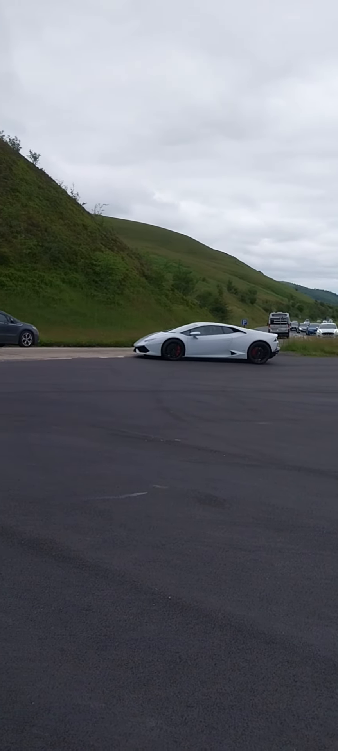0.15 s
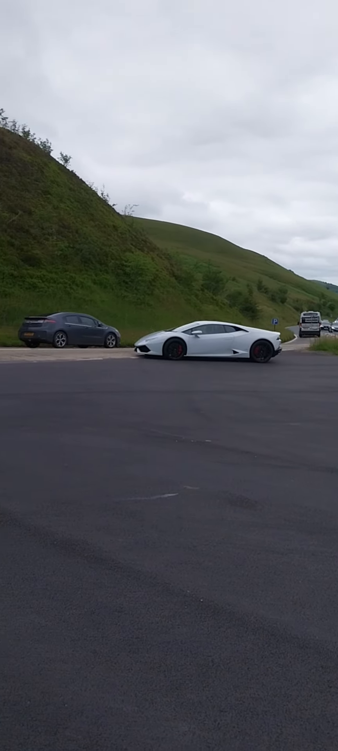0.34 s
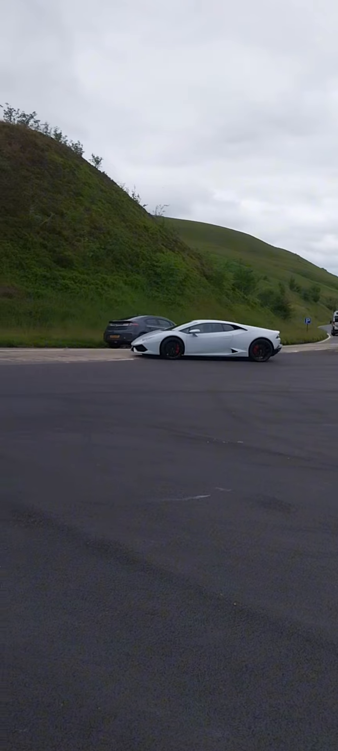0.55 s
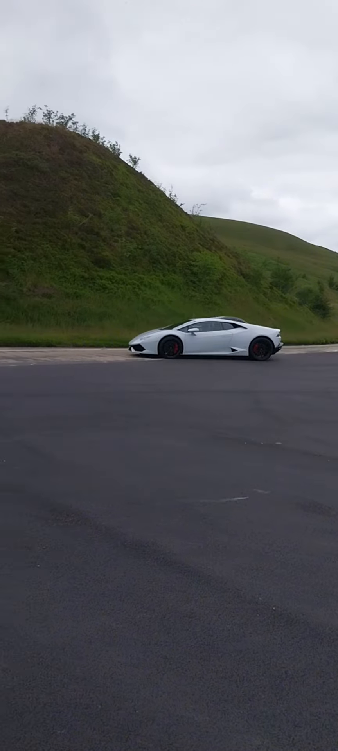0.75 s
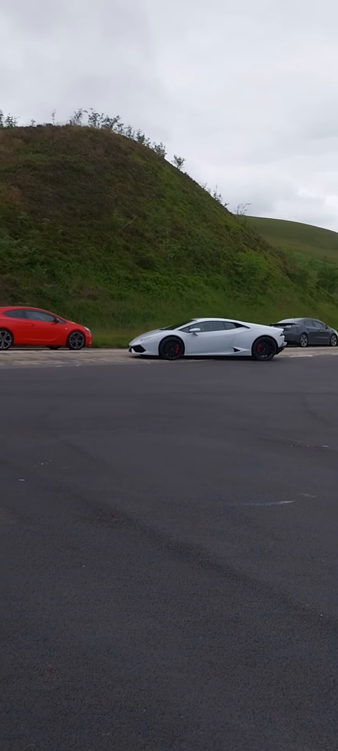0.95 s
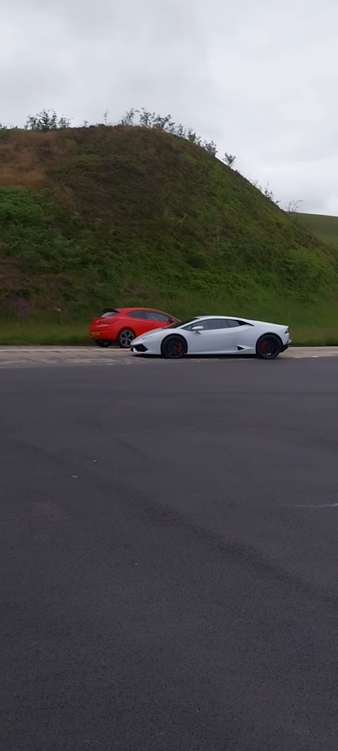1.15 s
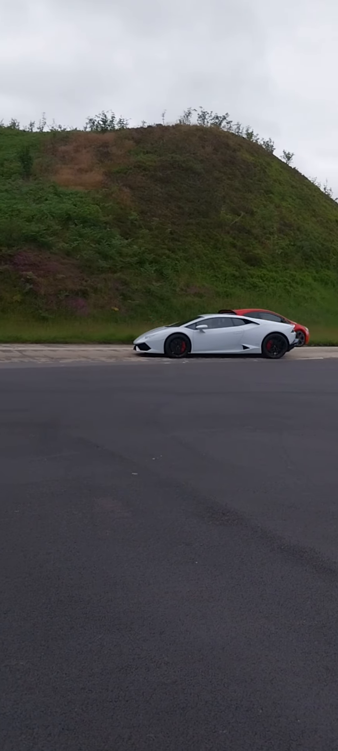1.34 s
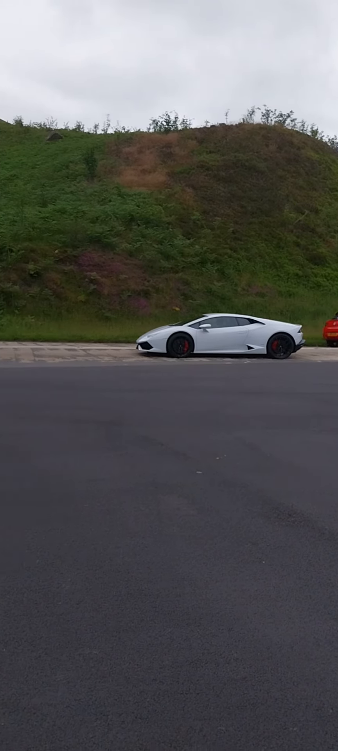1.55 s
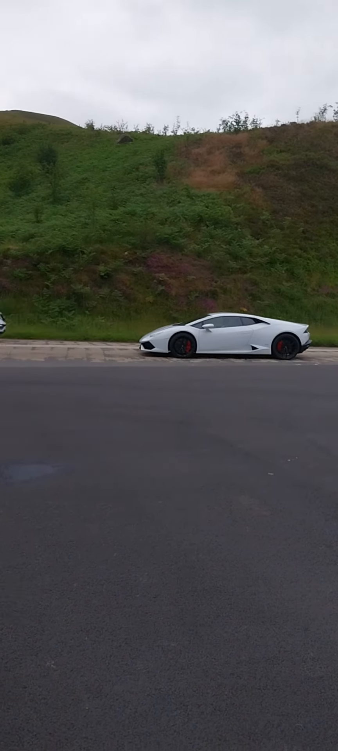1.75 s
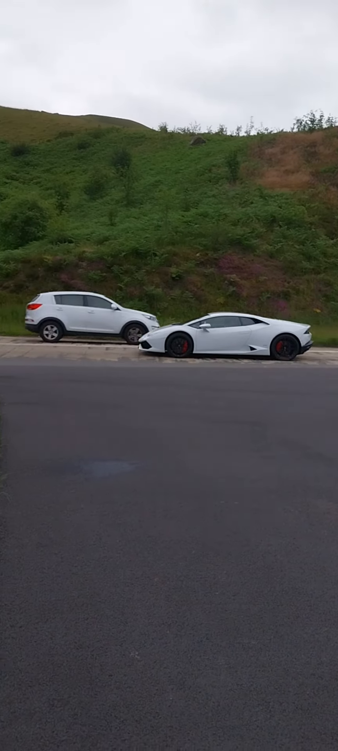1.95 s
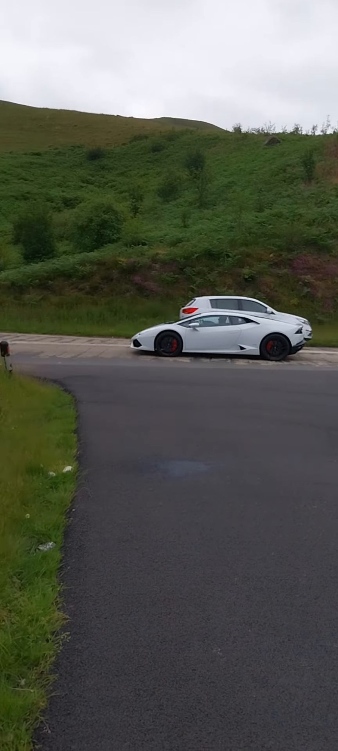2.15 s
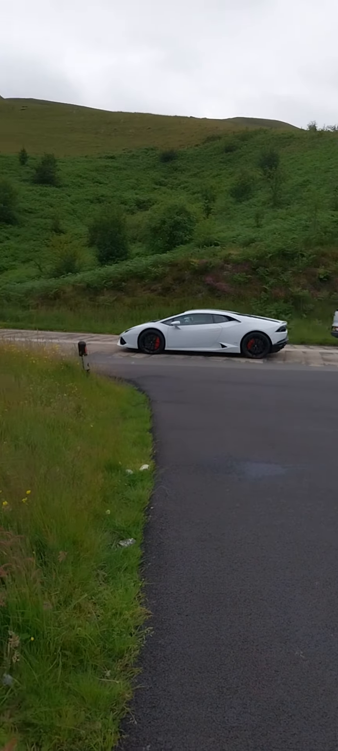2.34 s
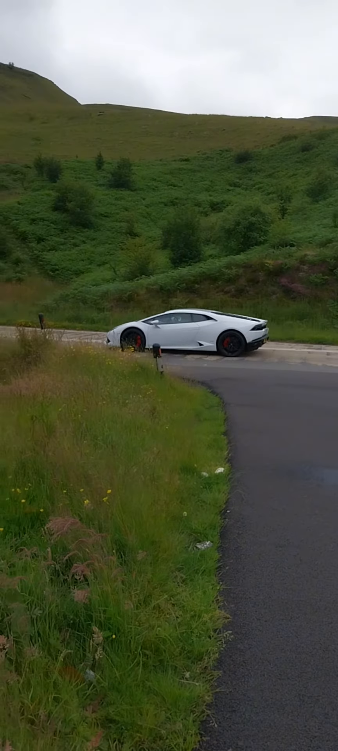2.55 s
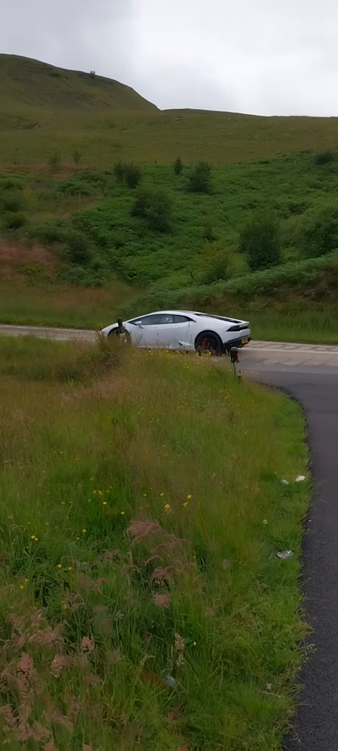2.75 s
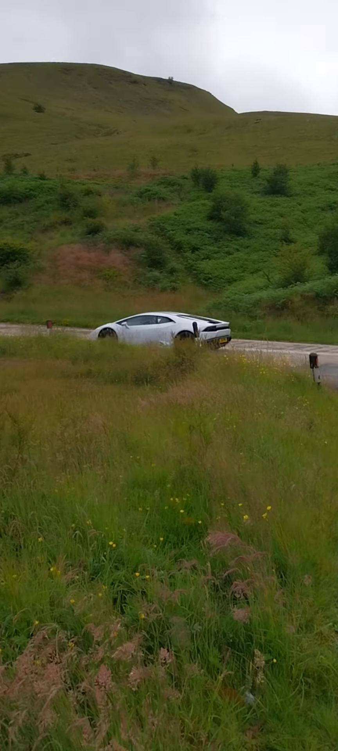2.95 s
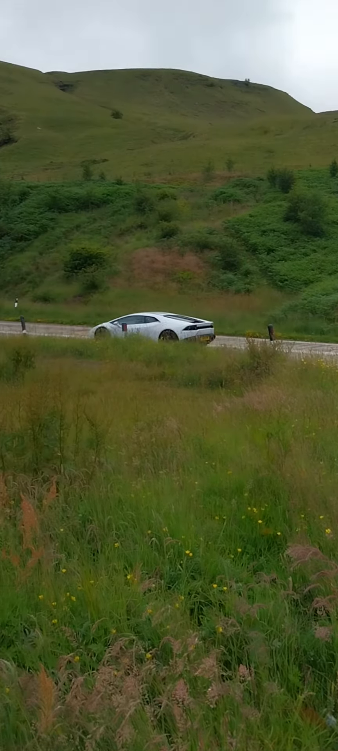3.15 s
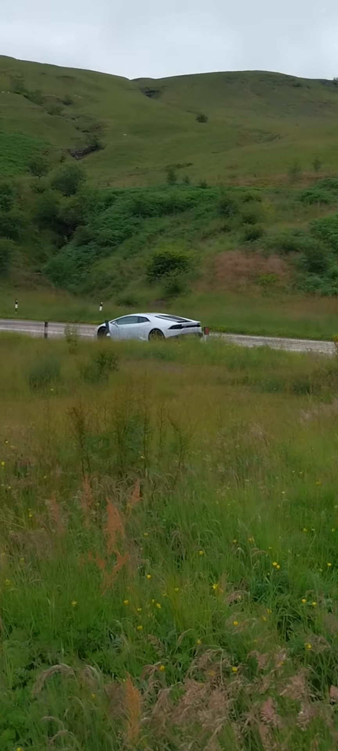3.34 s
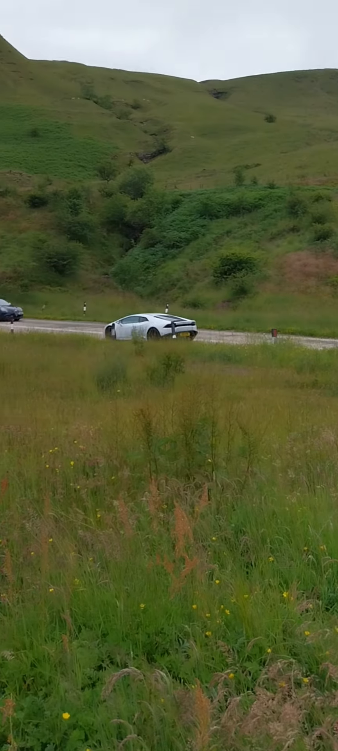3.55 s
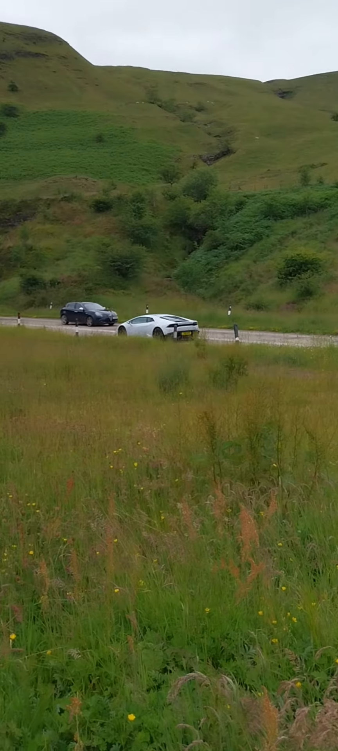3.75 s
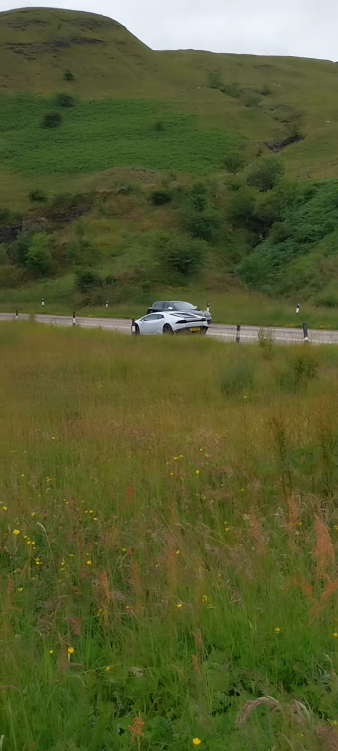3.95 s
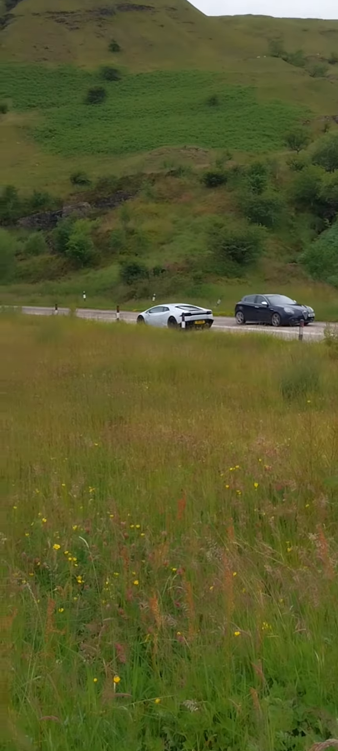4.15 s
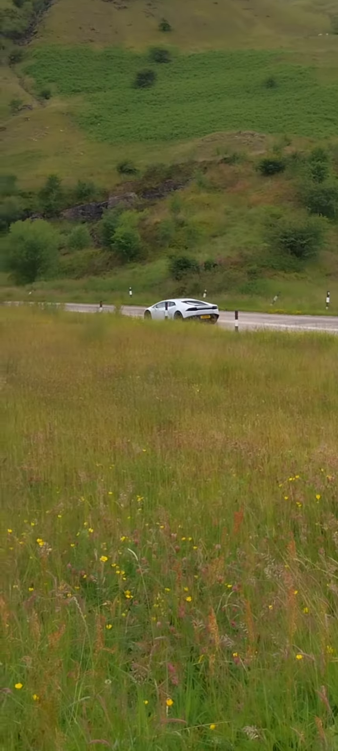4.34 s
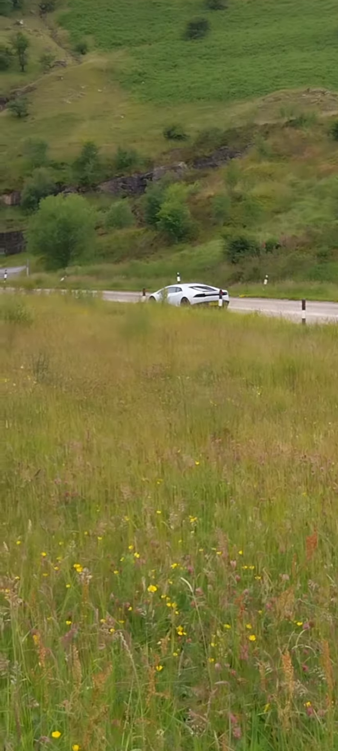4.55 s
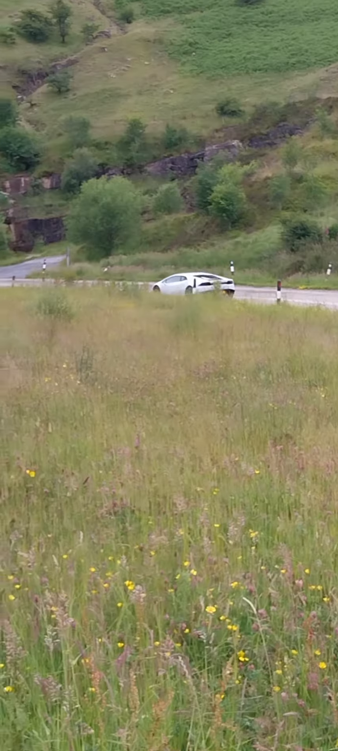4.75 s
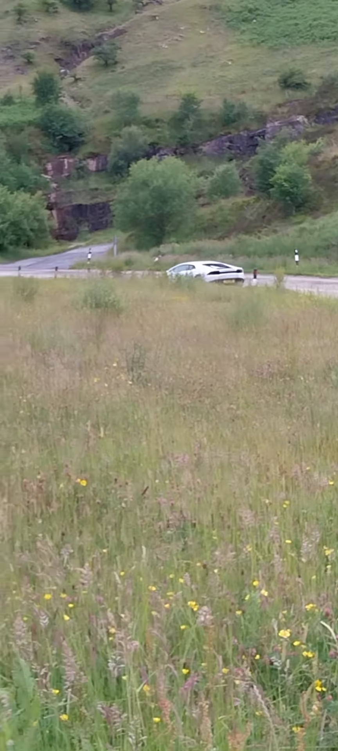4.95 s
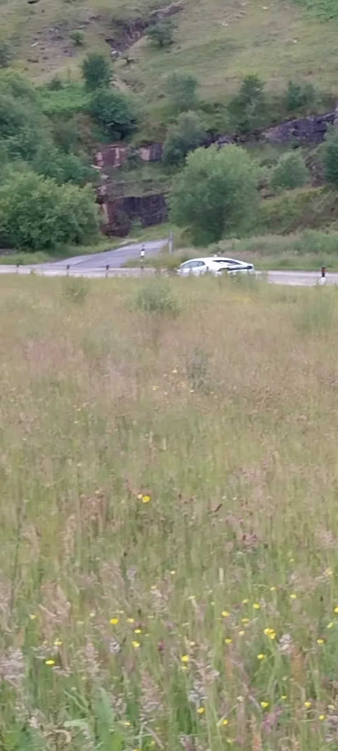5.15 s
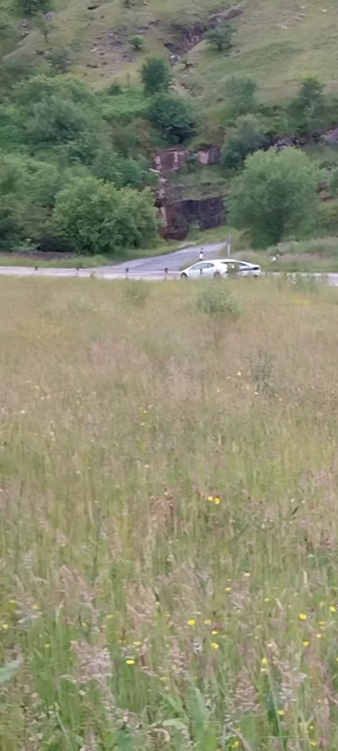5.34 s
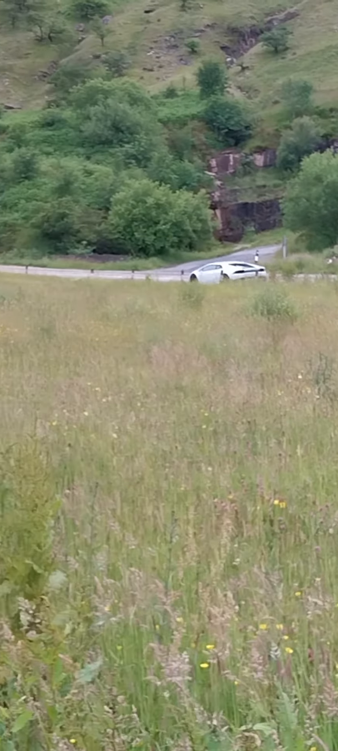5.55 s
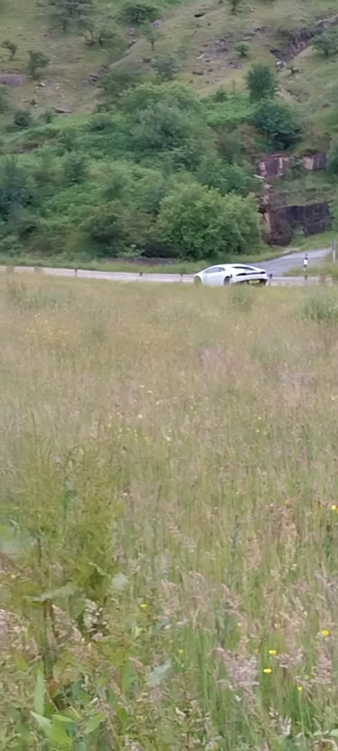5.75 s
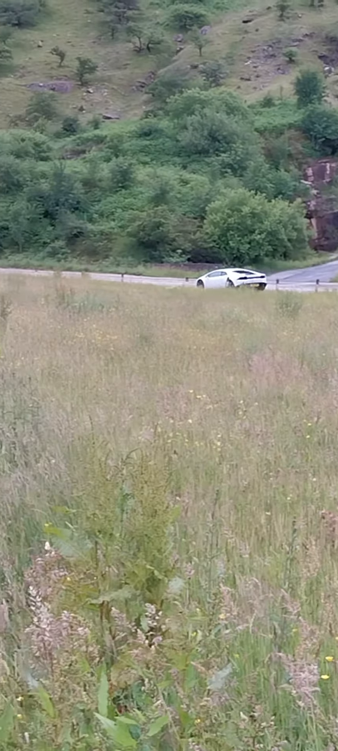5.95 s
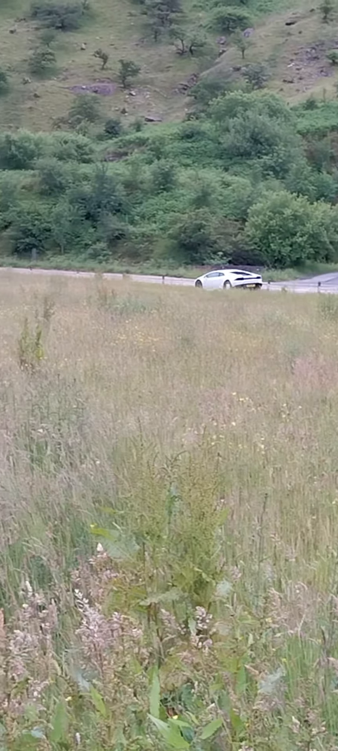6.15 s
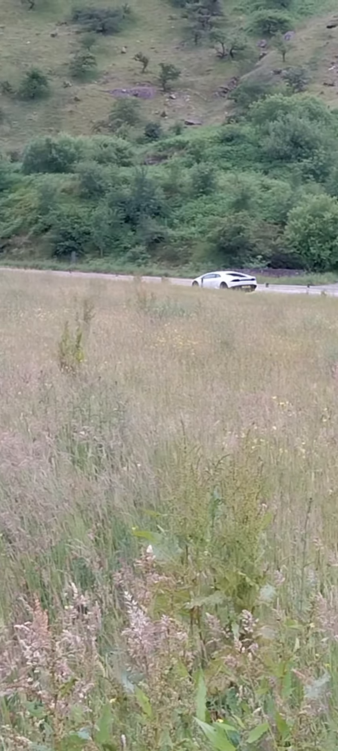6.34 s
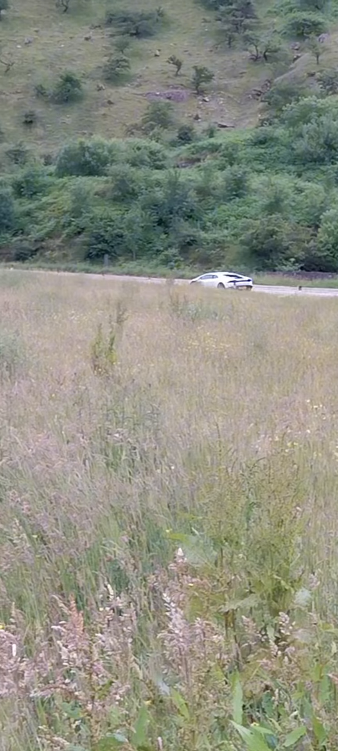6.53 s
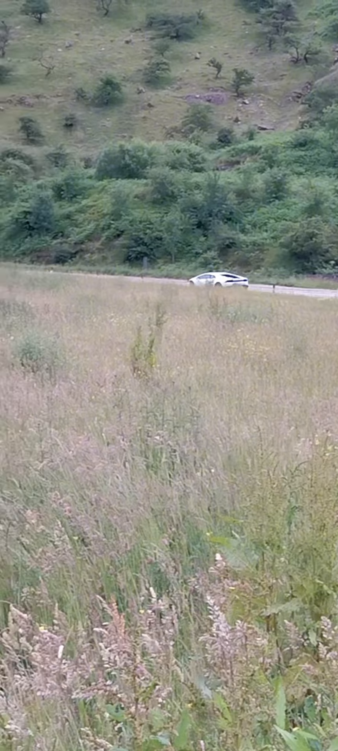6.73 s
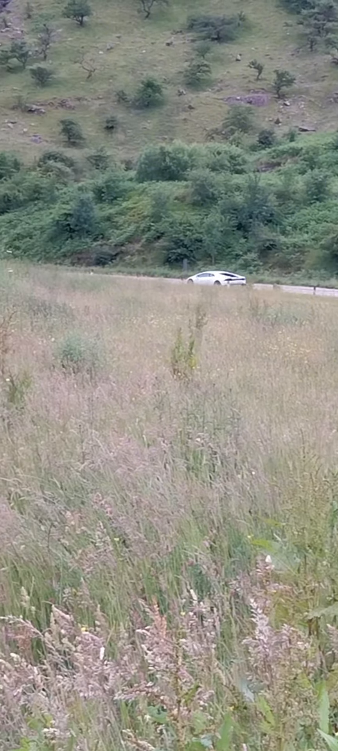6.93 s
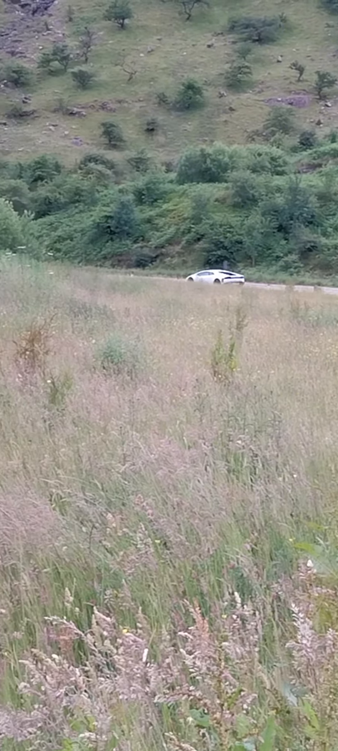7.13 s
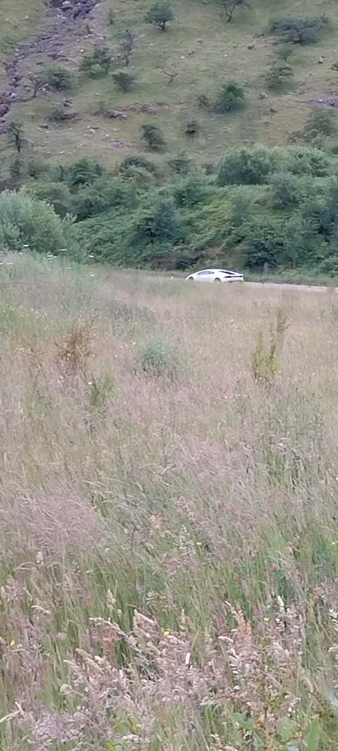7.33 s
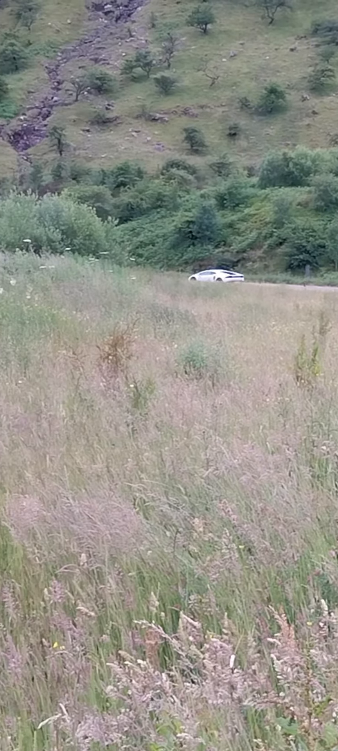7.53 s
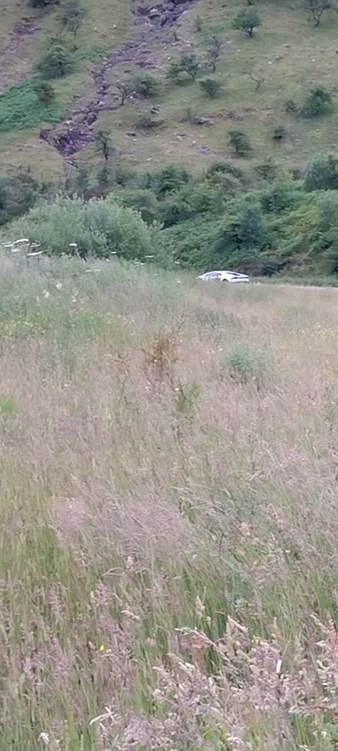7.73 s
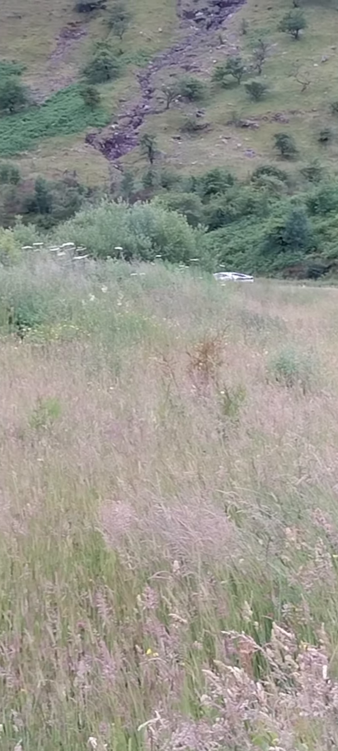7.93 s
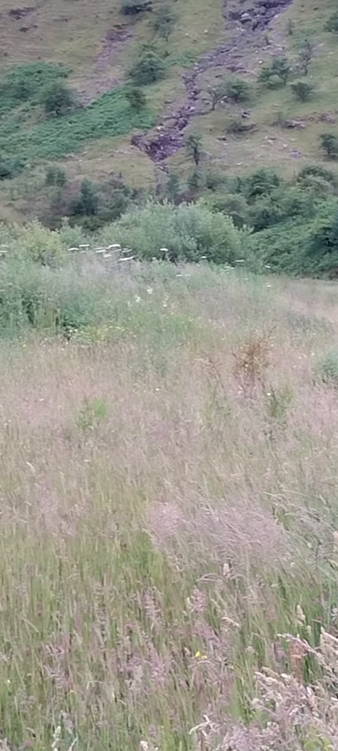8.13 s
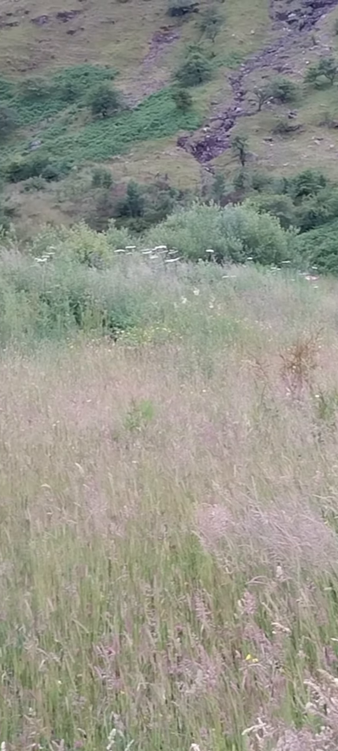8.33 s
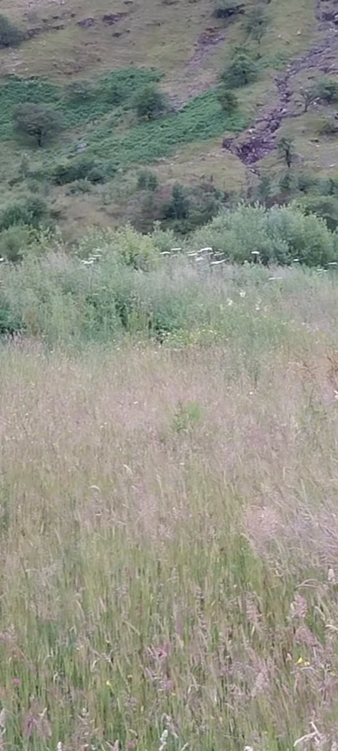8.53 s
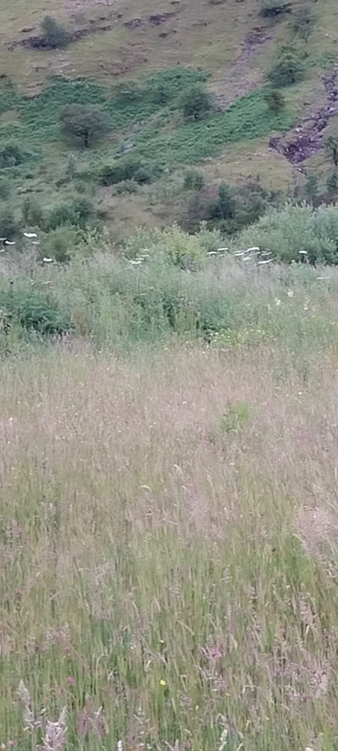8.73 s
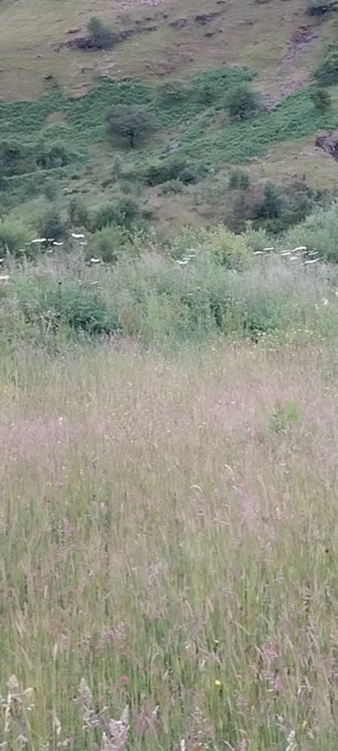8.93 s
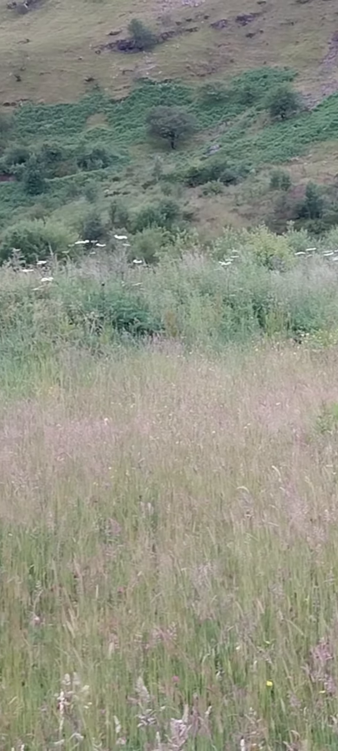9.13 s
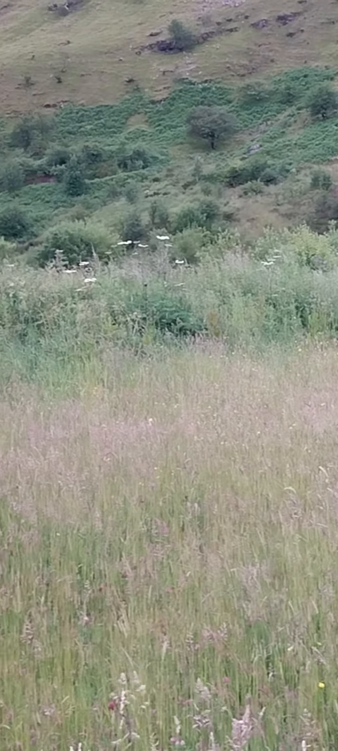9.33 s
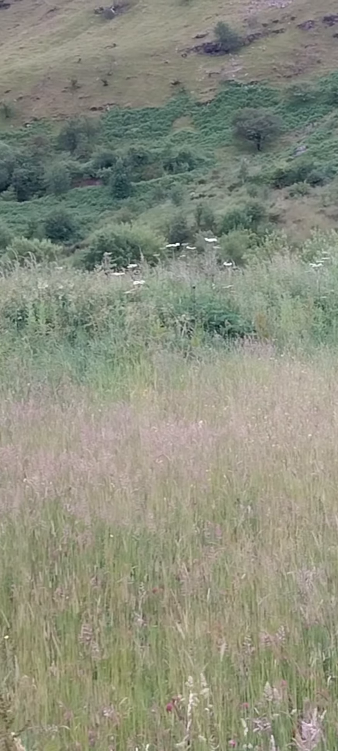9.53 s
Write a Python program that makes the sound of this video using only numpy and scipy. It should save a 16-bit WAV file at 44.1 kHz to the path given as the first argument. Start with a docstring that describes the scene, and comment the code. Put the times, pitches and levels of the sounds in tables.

```python
"""Roadside in a valley: a ten-cylinder sports car pulls away past a pair of microphone ports.
First gear, a cut and bang, second gear, a burbling shift, then a far drone in third; another car hums by.
Engines are sums of sines locked to the firing, with noise puffs, bangs and pipe booms for the exhaust.
Tyre roar, road rumble, grass hiss and wind are coloured noise; the hills answer with a decaying noise tail."""
import sys
import numpy as np
from scipy import signal
from scipy.fft import rfft, irfft, next_fast_len
from scipy.io import wavfile
from scipy.ndimage import uniform_filter1d, map_coordinates

SR = 44100
rng = np.random.default_rng(int(sys.argv[2]) if len(sys.argv) > 2 else 0)


def master_out(mix):
    """Clip the mix to full scale and print it as 16-bit PCM to the path in sys.argv[1]."""
    frames = np.transpose(np.atleast_2d(mix))
    ceiling = np.clip(frames, -1, 1)
    pcm = np.round(ceiling * 32767).astype(np.int16)
    wavfile.write(sys.argv[1], SR, pcm)


N = 426888


def amp(db):
    """Decibels to linear gain."""
    return 10 ** (np.asarray(db) / 20)


def unit(x):
    """x scaled to rms 1."""
    return x / np.sqrt(np.mean(x ** 2) + 1e-20)


def along(points, hz):
    """Read (Hz, value) points on a log frequency axis."""
    f, v = np.transpose(points)
    return np.interp(np.log(hz + 1), np.log(f + 1), v)


def curves(rows, t):
    """One value per time for each column after the first."""
    s, *cols = np.transpose(rows)
    return [np.interp(t, s, c) for c in cols]


def wobble(rate, size=N):
    """A random line with rate knots a second."""
    knots = rng.standard_normal(int(size * rate / SR) + 4)
    return map_coordinates(knots, [np.arange(size) * rate / SR], order=1)


def filtered(x, response):
    """x times a response of frequency."""
    m = next_fast_len(N + 8192)
    return irfft(rfft(x, m) * response(np.fft.rfftfreq(m, 1 / SR)), m)[..., :N]


def coloured(x, spectrum):
    """x through a filter that keeps the power of white noise."""
    power = amp(2 * along(spectrum, np.linspace(0, SR / 2, 4000)))
    gain = np.sqrt(np.mean(power))
    return filtered(x, lambda hz: amp(along(spectrum, hz)) / gain)


def noise(spectrum):
    """Coloured noise of rms 1."""
    return unit(filtered(rng.standard_normal(N), lambda hz: amp(along(spectrum, hz))))


# Colour of the low uneven orders: f/Hz, level/dB
UNEVEN_COLOUR = [(40, -23), (90, -21.5), (150, -19.5), (200, 0), (260, 3), (330, -8), (420, -47.5),
                 (550, -46.5)]
# Strength of the low uneven orders, from two fifths upward in fifths: level/dB
LOW_UNEVEN_DB = [3, 4.5, -1.5, 0, -1, 1.5, 2.5, -0.5, 0, -7.5, 0.5, -1, -4.5]
# Colour of the high uneven orders: f/Hz, level/dB
GROWL_COLOUR = [(400, 7), (650, 4.5), (900, -3), (1300, -17), (1650, -18.5), (1900, -6.5), (2200, -12),
                (2600, -27.5)]
# Strength of the high uneven orders by their place among ten: level/dB
HIGH_UNEVEN_DB = [-1.5, 4, -39, 1.5, -22, 0, -3, -27.5, -11, -24]
# Peaks and notches of the exhaust pipe, met by each order as it climbs: f/Hz, level/dB
PIPE_RESONANCE = [(75, -15), (100, 4.5), (128, -1.5), (143, -32.5), (157, -12), (167, 2), (215, 7),
                  (262, 14), (300, 5.5), (338, -7.5), (395, 3), (460, 1.5), (520, -4.5), (620, 0.5),
                  (690, -1.5), (745, -7.5), (860, 2.5), (980, -6), (1100, -9), (1250, -15.5), (1400, -9.5),
                  (1550, -15)]
# Colour of the bank orders above the sixth: f/Hz, level/dB
UPPER_COLOUR = [(500, 2), (1100, 2), (1500, 0), (1750, -2), (1900, 0), (2150, -12), (2600, -30)]
# Level of the note's middle, fullest while the tailpipes face the microphone: t/s, level/dB
FACING_LEVEL = [(0, -0.5), (.5, -6.5), (1, -3.5), (1.5, 1), (2.2, -1), (2.55, 3), (2.9, 3.5), (3.3, -5.5),
                (3.7, -16.5), (4.1, -9.5), (9.68, -9.5)]
MIDDLE_HZ, MIDDLE_OCTAVES = 490, 0.37  # centre and width of that middle


def exhaust_note(t, hz, firing, note_db, bright, orders_db, over_db, twist):
    """Even firing gives the bank orders; unequal cylinders give the uneven orders between them."""
    low_db, follows, high_db, _ = over_db
    facing_db, = curves(FACING_LEVEL, t)
    tone = np.zeros(len(t))
    for k in range(2, 71):
        order = k / 5  # five firings a cycle
        f = order * hz
        pipe_db = along(PIPE_RESONANCE, f)
        if k % 5 and k < 15:  # low uneven orders
            db = low_db + follows * (note_db - note_db.mean())
            db += along(UNEVEN_COLOUR, f) + LOW_UNEVEN_DB[k - 2] + 2.5 * wobble(7, len(t))
        elif k % 5:  # high uneven orders
            db = note_db + high_db + pipe_db + along(GROWL_COLOUR, f)
            db += HIGH_UNEVEN_DB[k % 10] + 2.5 * wobble(7, len(t))
        elif k <= 30:  # bank orders 1 to 6
            middle_db = facing_db * np.exp(-(np.log2(f / MIDDLE_HZ) / MIDDLE_OCTAVES) ** 2)
            db = note_db + middle_db + bright * np.log2(f / 400) + pipe_db
            db += orders_db[k // 5 - 1] + .8 * wobble(20, len(t))
        else:  # bank orders above the sixth keep the sixth's brightness
            db = note_db + bright * np.log2(6 * hz / 400) + orders_db[-1] + pipe_db
            db += along(UPPER_COLOUR, f) + 3 * wobble(16, len(t))
        phase = twist + rng.normal(0, .7 if k % 5 else .6)
        tone += amp(db) * np.sqrt(2) * np.cos(2 * np.pi * order * firing + phase)
    return tone


# Relative blast of each cylinder of a bank: level/dB
CYLINDER_DB = [3, 1.5, -16.5, -6.5, 9.5]
# One cylinder's snap, heard while the tailpipes face the microphone: t/s, level/dB
SNAP_LEVEL = [(1.5, -78), (2.05, -59), (2.16, -43), (2.23, -41.5), (2.3, -53), (2.42, -38), (2.56, -36),
              (2.66, -45), (2.8, -37), (2.96, -38), (3.12, -53), (4.1, -56)]


def exhaust_puffs(t, hz, firing, gas_db, blast_db):
    """Each firing pushes out a decaying puff of noisy gas; one cylinder in five also snaps."""
    whole = np.floor(firing).astype(int)
    since = (firing - whole) / hz  # seconds since the last firing
    cylinder = whole % 5
    snaps = cylinder == 0
    scatter_db = rng.normal(0, 3.5, whole[-1] - whole[0] + 1)[whole - whole[0]]  # each firing differs
    puff = amp(np.take(CYLINDER_DB, cylinder) + scatter_db) * np.exp(-since / 0.00043)
    white = rng.standard_normal((3, len(t)))
    gas = amp(gas_db + blast_db) * unit(0.4 + puff) * white[0]
    rasp = amp(gas_db) * unit(.45 + puff) * white[1]
    click = (np.diff(whole, prepend=whole[0]) > 0) * snaps * amp(.5 * scatter_db)
    spit = snaps * np.exp(-since / .0012) * white[2]
    snap_db, = curves(SNAP_LEVEL + [(SNAP_LEVEL[-1][0] + .2, -120)], t)
    snap = unit(click) + .8 * unit(spit)
    return gas, rasp + amp(snap_db) * snap


def gear(revs, rows, orders_db, over_db, snap_at, twist, fade):
    """One pull: note, gas and crackle share one firing clock, between a fast start and a cut."""
    end = rows[-1][0] + fade
    a, b = round(rows[0][0] * SR), min(round(end * SR), N)
    t = np.arange(a, b) / SR
    hz, = curves(revs, t)
    note_db, bright, gas_db = curves(rows, t)
    firing = np.cumsum(hz * (1 + .0015 * wobble(25, b - a))) / SR
    firing -= np.interp(snap_at, t, firing)  # the snapping cylinder fires at snap_at
    out = np.zeros((3, N))
    out[0, a:b] = exhaust_note(t, hz, firing, note_db, bright, orders_db, over_db, twist)
    out[1:, a:b] = exhaust_puffs(t, hz, firing, gas_db, over_db[-1])
    start = (t - t[0] + 0.00061) / 0.00092
    out[:, a:b] *= np.clip(np.minimum(start, (end - t) / fade), 0, 1)  # ignition cut at the end
    return out


# Pipe burbles off throttle: t/s, level/dB, f/Hz, length/s
BURBLES = [(2.35, -14, 207, .022), (2.385, -10.5, 225, 0.016), (4.097, -12.5, 212, 0.033),
           (4.144, -8, 224, .026), (4.17, -13.5, 217, .028), (4.204, -9.5, 216, 0.0091),
           (4.217, -13.5, 233, 0.033), (4.262, -19.5, 197, 0.023), (4.29, -22.5, 215, 0.024),
           (4.324, -18, 218, .016), (4.365, -16, 211, .014), (4.399, -25, 253, 0.01)]
# Backfires: t/s, bang drive level/dB, crack drive level/dB
BANGS = [(2.309, -11, -14), (2.325, -23, -18), (2.330, -19, -16), (2.356, -20.5, -42), (2.385, -20, -43),
         (2.397, -14, -18), (2.411, -15, -16), (2.423, -12, -11.5), (3.44, -13, -20), (3.62, -15, -29.5),
         (3.934, -20, -33.5), (4.143, -8.5, -28.5), (4.189, -14, -40), (4.249, -15.5, -43),
         (4.311, -15, -42)]


def backfires():
    """Unburnt fuel fires in the pipe: short booms of the pipe's air, bangs and cracks."""
    out, t = np.zeros(N + SR), np.arange(SR // 4) / SR
    for s, db, hz, length in BURBLES:
        swell = np.sqrt(np.abs(np.sin(np.pi * np.clip(t / length, 0, 1) ** .7)))
        out[round(s * SR):][:len(t)] += amp(db) * np.sin(2 * np.pi * hz * t) * swell
    bang_band = signal.butter(3, [400, 2500], "bandpass", fs=SR)
    crack_band = signal.butter(2, [3200, 6500], "bandpass", fs=SR)
    impulse = t == 0
    for s, bang_db, crack_db in BANGS:
        white = rng.standard_normal(len(t))
        bang = signal.lfilter(*bang_band, white) * amp(-60 * t / .04) * (1 - np.exp(-t / .001))
        crack = signal.lfilter(*crack_band, (4 * impulse + white) * amp(-60 * t / .005))
        crack += .25 * impulse
        out[round(s * SR):][:len(t)] += amp(bang_db) * bang + amp(crack_db) * crack
    return out[:N]


# First notch of the road-surface echo, as the car's distance changes: t/s, f/Hz
ECHO_NOTCH = [(0, 2960), (2.9, 2920), (3.15, 4350), (3.5, 4300), (9.68, 4620)]


def off_road(x, share):
    """The direct sound plus its echo off the asphalt, half a period of the notch later."""
    notch_hz, = curves(ECHO_NOTCH, np.arange(N) / SR)
    return x + share * map_coordinates(x, [np.arange(N) - SR / (2 * notch_hz)])


# Firing rate of one bank in each gear: t/s, f/Hz
FIRST_REVS = [(0, 83.5), (0.15, 83.3), (0.32, 80.5), (0.39, 83.5), (0.47, 91.5), (0.56, 97.5),
              (0.65, 101.5), (0.75, 108), (0.9, 116), (1.05, 123.6), (1.2, 132), (1.35, 139.7),
              (1.5, 147.8), (1.65, 155.3), (1.8, 167), (1.95, 177), (2.1, 193.5), (2.18, 198.5),
              (2.25, 200.8), (2.335, 204)]
SECOND_REVS = [(2.398, 160.3), (2.496, 158.5), (2.61, 153.5), (2.722, 163), (2.802, 167.8), (2.874, 170.7),
               (3.1, 184.7), (3.42, 201.3), (3.612, 208), (3.67, 204.5), (3.712, 204.5), (3.75, 210.9),
               (3.862, 214.5), (3.92, 213.8), (4.06, 206), (4.09, 208)]
THIRD_REVS = [(4.3, 176), (4.45, 165), (4.6, 162), (5, 161), (5.4, 164), (6, 168.5), (6.6, 172),
              (7.2, 175.5), (8.5, 182), (9.3, 192), (9.68, 195)]
# Exhaust in each gear: t/s, base note level/dB, brightness/(dB per octave), gas noise level/dB
FIRST_GEAR = [(0, -44.5, -14, -55), (0.449, -42.5, -12.5, -62), (.75, -41, -9, -57.5),
              (1.1, -34.5, -7.5, -53), (1.501, -28.5, -8.5, -55), (1.9, -21.5, -5, -50.5),
              (2.1, -18, -4, -38.5), (2.27, -18.5, -4, -44.5), (2.331, -18.5, -4, -32)]
SECOND_GEAR = [(2.398, -22.5, 0.4, -30), (2.499, -23, -6.2, -42.5), (2.65, -25.5, -3.2, -42),
               (2.9, -28.5, -3, -39.5), (3.2, -28, -2, -38), (3.4, -29.5, -2.5, -43.5),
               (3.47, -30.5, -2, -33.5), (3.68, -28, -5, -38.5), (3.759, -33, -10, -51.5),
               (3.93, -27.5, -12, -40), (4.0, -36, -11, -47), (4.09, -35.5, -8.5, -56)]
THIRD_GEAR = [(4.301, -39.5, 5, -89), (4.45, -38.5, -8.5, -82), (5.8, -41, -7, -90), (6.6, -38, -3.5, -83),
              (7.1, -42.5, -4.5, -84), (7.6, -59.5, -10.5, -90), (8.3, -53, -5, -90), (9.2, -48, 12, -81),
              (9.68, -50, -8, -90)]
# A row per gear, as the car turns away: level/dB of bank orders 1 to 6, then of all higher ones
BANK_ORDERS = [
    [-8.5, -1, 5.34, 0, 5, 5, -1],
    [-5.5, -6.5, 4.6, -0.5, 2, 7, 4.5],
    [5.5, -9.5, 8.1, -4.5, -14, -34, -43],
]
# A row per gear: low uneven orders level/dB, their dB per dB of the note,
# high uneven orders over the note/dB, blast over the gas noise/dB
UNEVEN_AND_BLAST = [(-35, 0.45, -10.5, 2.5), (-35.5, 0, -24, 1), (-45, .5, -62, -30)]
# A moment in each gear at which the snapping cylinder fires: t/s
SNAP_MOMENTS = [2.5, 2.425, 4.31]
# Phase of the orders against the firing in each gear, turning the pulse up or down: phase/rad
PULSE_TWIST = [2.4, 0, .6]
# Relative colour of the gas rush: f/Hz, level/dB per Hz
GAS_COLOUR = [(300, -45), (500, -27), (900, -9.5), (1400, 4.5), (1700, 4.5), (1900, 10), (2150, 7),
              (2700, 6.5), (3500, -21.5), (4500, -96.5)]
# Relative colour of the tailpipe crackle: f/Hz, level/dB per Hz
CRACKLE_COLOUR = [(1900, -44.5), (2500, -11), (3200, 6), (4000, 8.5), (5000, -4), (5800, -6), (6800, -19),
                  (8500, -32.5), (12000, -25.5), (15700, -29)]


def sports_car():
    """Three gears and the backfires between them; gas and crackle also bounce off the road."""
    revs = FIRST_REVS, SECOND_REVS, THIRD_REVS
    rows = FIRST_GEAR, SECOND_GEAR, THIRD_GEAR
    fades = .01, .02, .05  # s
    pulls = zip(revs, rows, BANK_ORDERS, UNEVEN_AND_BLAST, SNAP_MOMENTS, PULSE_TWIST, fades)
    tone, gas, crackle = sum(gear(*pull) for pull in pulls)
    breath = coloured(gas, GAS_COLOUR) + coloured(crackle, CRACKLE_COLOUR)
    return tone + off_road(breath, share=0.69) + backfires()


# The other car: t/s, f/Hz, order 1 level/dB, order 3 level/dB
PASSING_HUM = [(5.2, 64.46, -38, -44), (6.001, 68.47, -36, -37), (6.5, 70.87, -36.5, -44),
               (7.001, 72.4, -32, -44), (7.6, 75.6, -26.5, -32.5), (8, 75.5, -32, -45),
               (8.25, 57.9, -36, -37), (8.7, 50.5, -48, -47)]


def passer():
    """Another engine hums in two orders, its pitch dropping as it goes by."""
    t = np.arange(N) / SR
    hz, low_db, high_db = curves(PASSING_HUM, t)
    turn = 2 * np.pi * np.cumsum(hz * (1 + .004 * wobble(9))) / SR
    hum = amp(low_db + 0.5 * wobble(3.4)) * np.sin(turn)
    hum += amp(high_db + 0.62 * wobble(3.7)) * np.sin(3 * turn)
    fade = np.minimum(t - PASSING_HUM[0][0], PASSING_HUM[-1][0] - t) / 0.11
    return np.sqrt(2) * hum * np.clip(fade, 0, 1)


# Left-right likeness of wide noise: f/Hz, correlation
LIKENESS = [(60, 0.95), (200, 1), (1000, 0.86), (2500, 0.34), (5000, 0.25), (15000, .15)]


def rush(spectrum, patchy_db):
    """Stereo noise of rms 1 with patches of random gain, less alike left and right in the treble."""
    z = signal.stft(rng.standard_normal((2, N)), nperseg=512)[2]
    field = uniform_filter1d(rng.standard_normal(z.shape[1:]), size=6, axis=0)
    field = uniform_filter1d(field, size=14, axis=1)
    pair = signal.istft(z * amp(patchy_db * unit(field)), nperseg=512)[1][:, :N]

    def mid_side(hz):
        turn = np.arccos(np.clip(along(LIKENESS, hz), -1, 1)) / 2
        return amp(along(spectrum, hz)) * [np.cos(turn), np.sin(turn)]

    mid, side = filtered(pair, mid_side)
    return unit(np.array([mid + side, mid - side]))


# Relative colour of the road rumble: f/Hz, level/dB per Hz
RUMBLE_COLOUR = [(47, -12.5), (80, 2), (189, 2.5), (225, 7.5), (275, -1), (333, -6.5), (500, -28.5),
                 (650, -62.5), (1100, -120)]
# Relative colour of the tyre roar: f/Hz, level/dB per Hz
ROAR_COLOUR = [(250, -18), (380, 4), (600, 4), (1000, 4.5), (1400, -1), (1700, -5.5), (1900, -8),
               (2600, -34), (3500, -25), (5000, -41)]
RUMBLE_DB, RUMBLE_FOLLOWS = -30, 0.59  # mean level, dB per dB of far road
TYRES_DB = -5.5  # the sports car's tyres over its base note


def road(far_db):
    """Low rumble, and roar whose power sums the far road and the sports car's tyres."""
    near_db = curves(FIRST_GEAR + SECOND_GEAR + THIRD_GEAR, np.arange(N) / SR)[0] + TYRES_DB
    rumble_db = RUMBLE_DB + RUMBLE_FOLLOWS * (far_db - far_db.mean())
    rumble = amp(rumble_db) * rush(RUMBLE_COLOUR, patchy_db=1.2)
    roar_level = np.hypot(amp(far_db), amp(near_db)) * amp(.7 * wobble(8))
    return rumble + roar_level * rush(ROAR_COLOUR, patchy_db=1.3)


# Small dry ticks nearby: t/s, drive level/dB
TICK_TIMES = [(0.8636, -44.5), (1.0017, -46.5)]


def ticks():
    """Brief bright clicks of twice-differenced noise."""
    out, t = np.zeros(N + SR), np.arange(SR // 50) / SR
    for s, db in TICK_TIMES:
        bright = np.diff(rng.standard_normal(len(t) + 2), 2)
        out[round(s * SR):][:len(t)] += amp(db - 60 * t / .008) * bright
    return out[:N]


# How much the left port leads the right: f/Hz, phase/rad
PORT_LEAD = [(0, 0.077), (1700, 0.35), (2400, 2.68), (3300, 1.1), (4600, 0.35), (7000, 2), (16000, 1.4)]
PAN_DB = -1.2  # left minus right


def two_ports(x):
    """Sound reaches the two ports a little apart in phase and level."""
    sides = np.array([[1], [-1]])
    lead = lambda hz: np.exp(.5j * np.interp(hz, *np.transpose(PORT_LEAD)) * sides)
    return filtered(x, lead) * amp(PAN_DB / 2 * sides)


# Decay time of the hillsides: f/Hz, t60/s
VALLEY_DECAY = [(150, 0.67), (1000, 0.99), (5000, 0.3)]


def valley(x):
    """The hillsides answer 700 samples late; each frequency dies at its own speed."""
    hz, t, z = signal.stft(rng.standard_normal((2, SR)), SR, nperseg=256)
    decay = amp(-60 * t / along(VALLEY_DECAY, hz)[:, None])
    tail = signal.istft(z * decay, SR, nperseg=256)[1]
    late = np.pad(x, (700, 0))[None]
    return signal.fftconvolve(late, tail / np.linalg.norm(tail[0]), axes=1)[:, :N]


# Wind in the grass: t/s, level/dB
GRASS_LEVEL = [(0, -55), (1, -50.5), (1.6, -46), (2.5, -47.5), (3.4, -46), (4.6, -51.5), (5.7, -47.5),
               (6.6, -43), (7.3, -45), (7.7, -47.5), (8.2, -46.5), (9.1, -47), (9.68, -48.5)]
# Relative colour of the grass: f/Hz, level/dB per Hz
GRASS_COLOUR = [(1500, -26), (2050, 1), (2400, 4), (2800, 2), (3200, -2), (3800, 0), (4400, -7),
                (5200, -5.5), (6700, -8.5), (7600, -13.5), (8500, -24.5), (12200, -15.5), (15700, -28)]


def grass():
    """Wind stirs the grass into a wide, wavering hiss."""
    level_db = curves(GRASS_LEVEL, np.arange(N) / SR)[0] + 1.2 * wobble(8)
    return amp(level_db) * rush(GRASS_COLOUR, patchy_db=1.2)


# Relative colour of the wind: f/Hz, level/dB per Hz
WIND_COLOUR = [(20, -28), (40, 17), (70, 24.5), (110, -10), (160, -17.5), (260, -48.5)]
# Wind slaps: t/s, level at the right port/dB
WIND_SLAPS = [(5.92, -16), (8.52, -19), (8.79, -13), (8.91, -13)]


def wind(level_db):
    """Spiky buffeting, unrelated between the ports and stronger on the right, with single slaps."""
    lumps = amp(6 * np.array([wobble(18), wobble(18)]))
    buffets = unit(lumps * np.array([noise(WIND_COLOUR), noise(WIND_COLOUR)]))
    out = amp(level_db + [[-2.5], [3]]) * buffets
    u = np.arange(-SR // 50, SR // 50) / SR / .0024  # time in slap widths of 2.4 ms
    slap = (1 - u * u) * np.exp(-u * u / 2)
    for s, db in WIND_SLAPS:
        out[:, round(s * SR) - SR // 60:][:, :len(u)] += amp(db + np.array([[-5], [0]])) * slap
    return out


# Air and distance: t/s, wind level before the port offsets/dB, far road level/dB
WIND_AND_ROAD = [(0, -53.5, -37), (1, -59.5, -36.5), (1.6, -40, -37.5), (2.3, -59, -38), (3.3, -63.5, -41),
                 (3.9, -43, -42), (4.34, -42.5, -33), (4.9, -35, -39.5), (5.7, -35.5, -35.5),
                 (6.3, -36.5, -32), (6.75, -38, -33.5), (7.35, -39, -31.5), (7.75, -40.5, -37),
                 (8.3, -37.5, -37), (9.1, -33, -33.5), (9.68, -38, -36)]


def scene():
    """Cars, road and ticks reach the two ports; hills, grass and wind surround them."""
    wind_db, far_db = curves(WIND_AND_ROAD, np.arange(N) / SR)
    cars = sports_car() + passer()
    direct = two_ports(cars + road(far_db) + ticks())
    return direct + amp(-15) * valley(cars) + grass() + wind(wind_db)


TOP_HZ, LOW_CUT_HZ = 15740, 38  # band limit, bass corner


def record(dry):
    """The input stage rounds off the highest peaks, drops the deepest bass and stops at the band limit."""
    soft = dry / (1 + np.abs(dry / .97) ** 6) ** (1 / 6)
    return filtered(soft, lambda hz: (hz < TOP_HZ) / np.sqrt(1 + (LOW_CUT_HZ / (hz + 1)) ** 6))


dry = scene()
out = record(dry)
master_out(out)
```